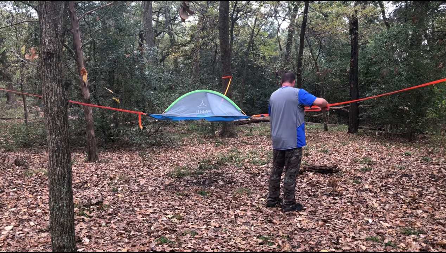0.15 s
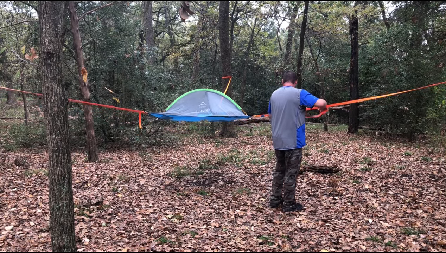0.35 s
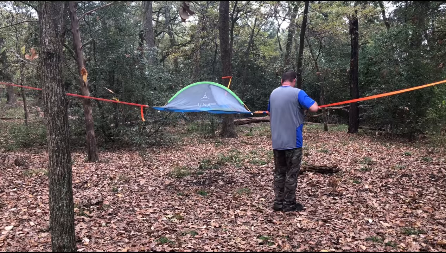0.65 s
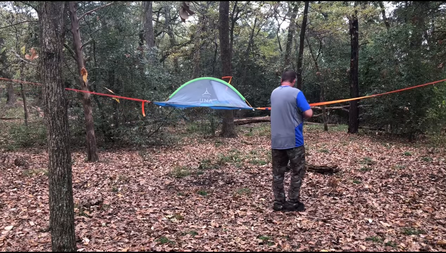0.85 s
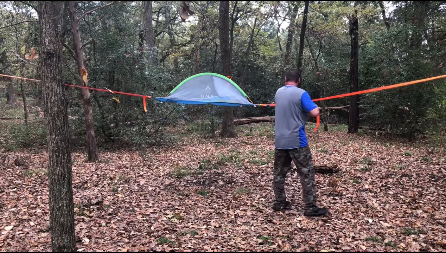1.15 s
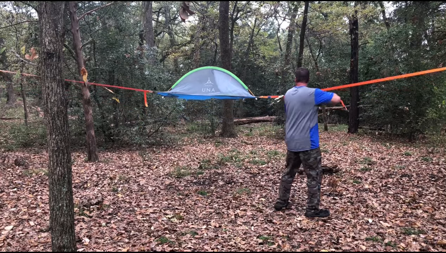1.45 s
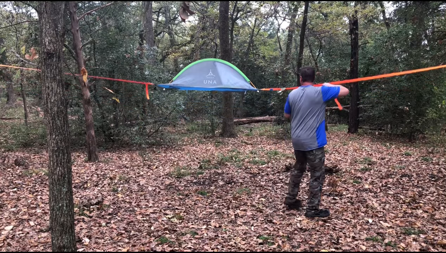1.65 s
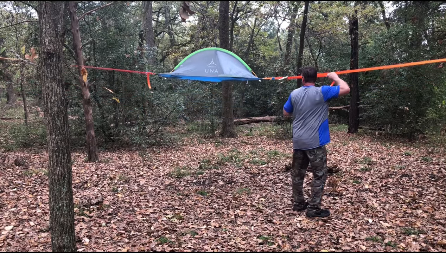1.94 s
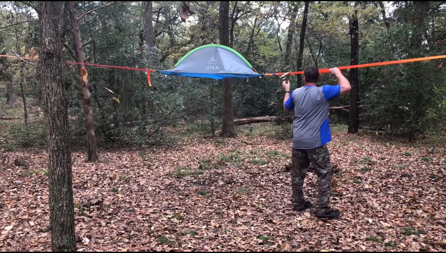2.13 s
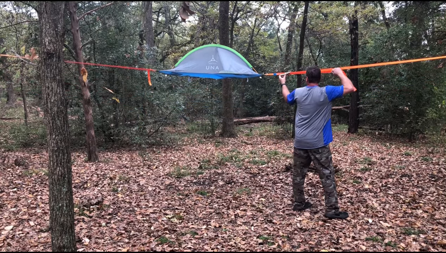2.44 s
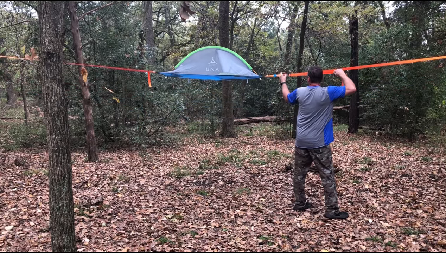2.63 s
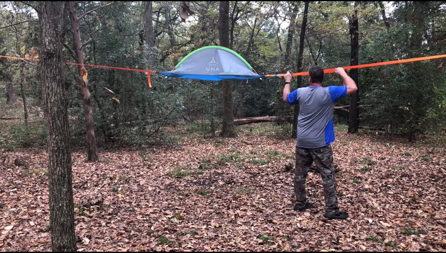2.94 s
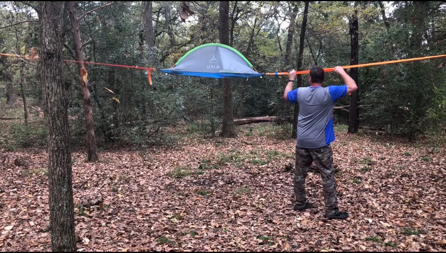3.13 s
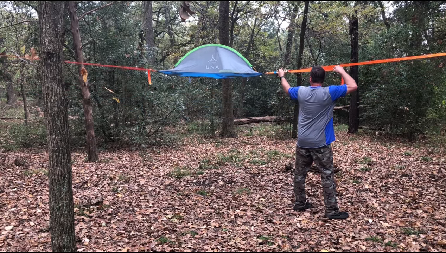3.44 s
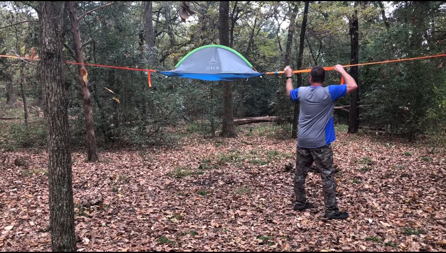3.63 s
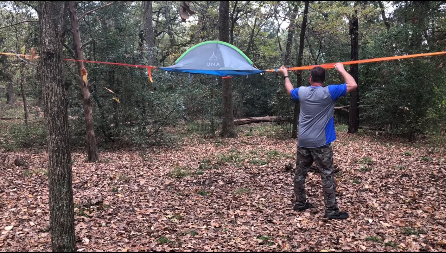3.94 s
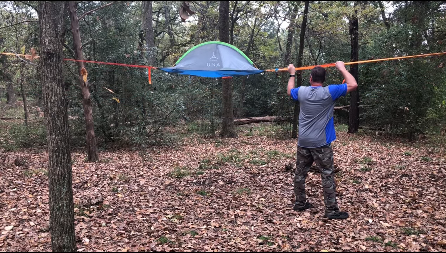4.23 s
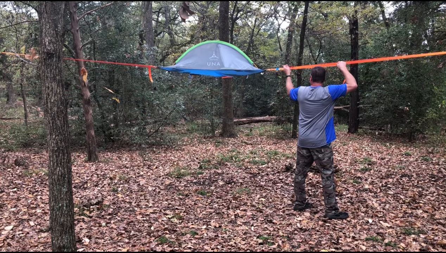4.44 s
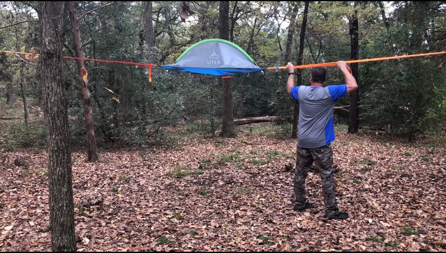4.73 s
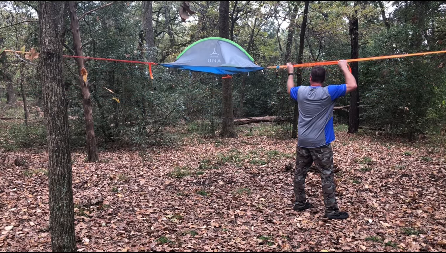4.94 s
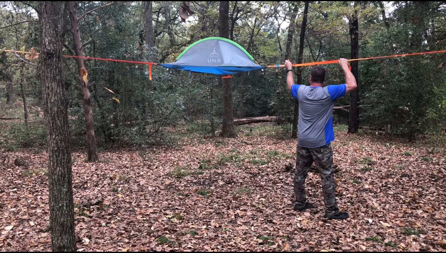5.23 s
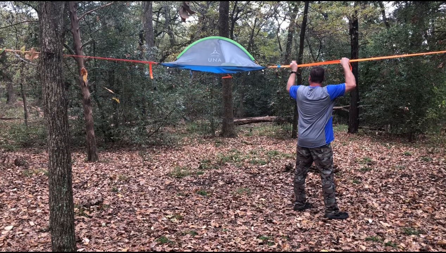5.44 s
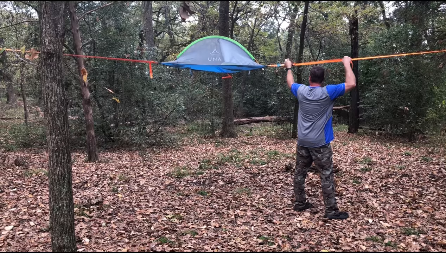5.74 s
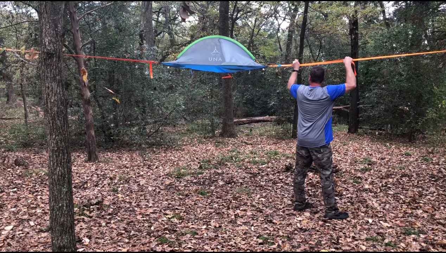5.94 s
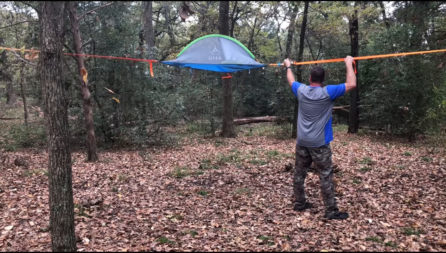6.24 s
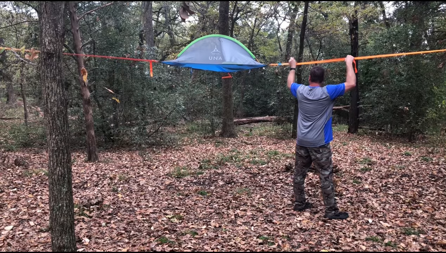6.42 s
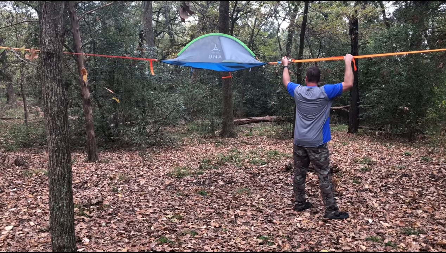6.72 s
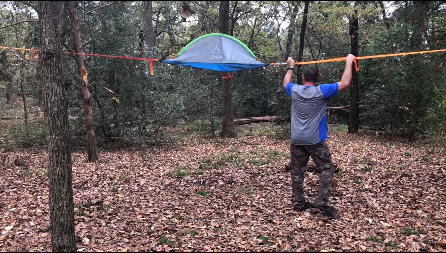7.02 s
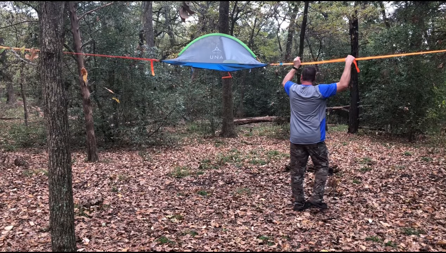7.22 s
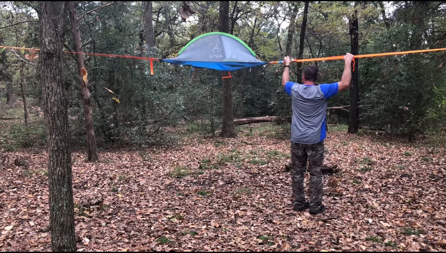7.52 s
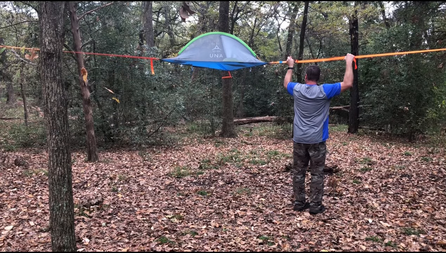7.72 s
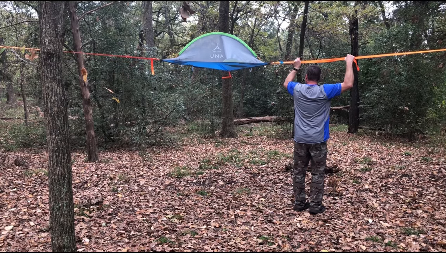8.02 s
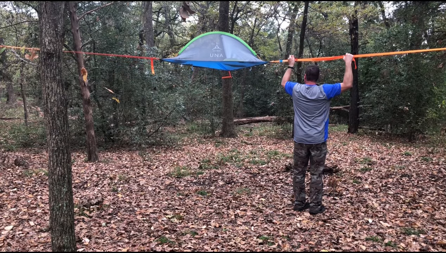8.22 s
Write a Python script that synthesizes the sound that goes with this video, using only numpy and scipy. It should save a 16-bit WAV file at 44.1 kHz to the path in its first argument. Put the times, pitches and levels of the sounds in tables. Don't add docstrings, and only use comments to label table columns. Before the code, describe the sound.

In a hushed wood, after a few leafy footsteps, a hand ratchet clacks steadily back and forth, sharp metallic clicks in pairs with light handle rattle.

```python
import sys
import numpy as np
from scipy import signal
from scipy.fft import rfft, irfft, next_fast_len
from scipy.io import wavfile
from scipy.ndimage import uniform_filter1d

SR = 44100
rng = np.random.default_rng(int(sys.argv[2]) if len(sys.argv) > 2 else 0)


def int16_out(signal):
    q = np.round(np.clip(np.atleast_2d(signal).T, -1, 1) * 32767)
    wavfile.write(sys.argv[1], SR, q.astype(np.int16))


def volts(x):
    e = np.asarray(x, float) / 20
    return 10 ** e


N = 369116

# f/Hz, density/dB per Hz
AIR_SPECTRUM = [(184, -14), (212, -20), (440, -22), (2310, -31.5), (2810, -35.5), (3520, -33.5),
                (10800, -45.5), (16500, -57)]
# f/Hz, density/dB per Hz
TRAFFIC_SPECTRUM = [(12, -44.5), (27, -12.5), (79, 4.5), (117, 0.5), (135, -3.5), (184, -28)]
# t/s, level/dB
HIGH_HISS_LEVEL = [(0.0, -95), (1.7, -80.5), (8.37, -73)]
# t/s, hold/s, crackle level/dB, release/s
FOOTSTEPS = [(0.397, 0.19, -54, 0.12), (0.946, .006, -59.5, 0.041), (0.987, 0.1, -57.5, .06),
             (1.12, 0.14, -52.5, 0.2), (1.472, 0.089, -70, .1), (1.6, .04, -62, .1),
             (1.712, .012, -57.5, 0.088), (1.803, 0.062, -50.5, 0.055), (1.998, .05, -62, .1),
             (2.097, 0.075, -60, 0.45), (2.295, 0.18, -57.5, .08), (2.387, 0.01, -55, .04),
             (2.52, .03, -69, .15), (6.99, .17, -61.5, 0.11)]
# f/Hz, density/dB per Hz
LEAF_SPECTRUM = [(880, -9), (1500, -22), (2270, 2.5), (3410, 2.5), (9470, -7), (13700, -6), (16000, -5.5)]
# t/s, peak level/dB, loudest f/Hz
HANDLE_RATTLES = [(2.637, -34, 9000), (2.6851, -54, 4100), (2.7443, -47, 5700), (2.797, -46.5, 7800),
                  (3.3148, -40.5, 8300), (3.3617, -40.5, 8550), (3.6404, -34, 8600), (3.6602, -34.5, 10100),
                  (3.9735, -39.5, 6200), (3.9953, -33, 8200), (4.246, -45, 8100), (4.515, -39.5, 8200),
                  (4.7345, -36, 6000), (4.7522, -33.5, 7860), (5.0224, -38.5, 7500), (5.0636, -37.5, 9000),
                  (5.273, -33, 9600), (5.295, -37, 7800), (5.5556, -38.5, 8800), (5.6075, -42, 7500),
                  (5.8163, -33.5, 7950), (6.1193, -35, 8750), (6.366, -30, 11400), (6.3874, -33.5, 8600),
                  (6.6826, -41.5, 4730), (6.7092, -34, 6250), (6.9653, -34, 9200), (7.3972, -38, 6650),
                  (7.664, -36.5, 8300), (8.2857, -37.5, 9000)]
# t/s, peak level/dB, rebound delay/ms, rebound level/dB, dullness/dB
SLACK_DROPS = [(3.0183, -19.5, 2, 3, -26), (3.1773, -14, 5.3, -20, -15), (3.7478, -17.5, 2.7, 6, -8),
               (3.8035, -12, 3.2, -16, -10), (4.3143, -12, 3.7, -9, -17), (4.3698, -15.5, 5.7, -24, -26),
               (4.8357, -16, 2.2, 1, -19), (4.8894, -20.5, 1.7, 1.5, -5), (5.397, -17, 3, -3.5, -8.5),
               (5.4531, -16, 4.1, -4.5, -9), (5.948, -14.5, 3.2, -5, -5.5), (6.0047, -18, 3.5, 2, -14.5),
               (6.513, -19, 2.9, 3, -12.5), (6.581, -19.5, 2.4, 4, -5), (7.2073, -15, 3.5, -2.5, -14),
               (7.2725, -22, 4.3, 3.3, 8), (7.9786, -19, 4.5, 1.5, -16), (8.1066, -16.5, 4.1, -0.5, -5)]
# slip lead/ms, slip level/dB, graze lead/ms, graze level/dB
SLACK_TICKS = [(20.3, -34.5, 2.1, -19.5), (6.45, -27, 2.5, -20), (14.1, -42, 4.9, -31),
               (8.3, -27, 3.6, -38.5), (11, -31.5, 1.2, -30), (8.85, -34, 1.9, -19), (12.7, -31, 2.9, -26),
               (5.6, -27, 1.6, -18), (12.5, -35, 4.5, -22.5), (10.3, -28, 6, -25), (13.9, -30, 3.7, -45),
               (12, -31, 6.1, -33), (12.7, -31, 3.7, -28.5), (13.8, -35, 12, -28), (15, -32, 3, -27),
               (19.6, -40, 7.1, -28), (25.2, -25, 3.9, -25), (25.7, -31, 4.5, -35)]
# f/Hz, level/dB, t60/s
SLACK_MODES = [(4000, -27, 0.0034), (5210, 5, 0.0022), (6000, 0.5, 0.0068), (8300, -5, 0.0087),
               (10030, -2, 0.0081), (10950, -1, 0.0048), (13500, -12.5, 0.0089), (14700, -4.5, 0.0052),
               (15100, -13.5, 0.006)]
# f/Hz, level/dB, t60/s
SLACK_FRAME_MODES = [(3550, -40.5, .05), (5000, -52.5, 0.027), (5390, -44, 0.026), (9600, -40.5, 0.035),
                     (13900, -40.5, .05)]
# t/s, peak level/dB, rebound level/dB, dullness/dB, frame ring level/dB
LOADED_DROPS = [(3.438, -16, -3, -6, 8), (3.5095, -16.5, -4.5, -6.5, 9.5), (4.0547, -15.5, 3, -10, -1),
                (4.139, -14.5, 0.5, -5.5, -11), (4.577, -16.5, 9, -19, -17), (4.6378, -16.5, 4.2, -15, -1),
                (5.1121, -11.5, -14, -13, 6.5), (5.1794, -16, -2.5, -11, -2), (5.656, -14.5, 0.6, -13, -6),
                (5.7092, -15, -4.5, 1, 0), (6.1813, -18, 2.5, -13, 0), (6.2269, -17, -2.7, -9, 6.5),
                (6.7735, -14.5, -3.5, -12, 6.5), (6.8402, -14, -12, -2.5, 2.5), (7.4872, -16, -1, 3, 7),
                (7.5572, -17.5, 3, 4, -6)]
# f/Hz, level/dB, t60/s
LOADED_MODES = [(1730, -19.5, 0.028), (2410, -33, 0.0081), (4020, -16.5, 0.09), (6000, -34, 0.041),
                (7333, 4, 0.02), (8940, 1.5, 0.0058), (10100, 4, 0.014), (10720, 2, 0.017),
                (11400, 0.5, 0.015), (11970, 9.5, 0.0082), (13540, -0.5, 0.021), (13900, -7, 0.015),
                (16000, 5, .012)]
# f/Hz, level/dB, t60/s
LOADED_FRAME_MODES = [(7420, -21, 0.043), (7420, -29.5, 0.049), (10100, -41.5, .04), (10690, -31, .05),
                      (11850, -16.5, .035), (12080, -20, 0.04), (13400, -34, .04)]
LEVER_FREEDOM = [1, -3, 0, 0, 3, 7, 5, 0.5]
# f/Hz, t60/s
TRUNK_DECAY = [(1500, 0.12), (4000, 0.62), (8000, 0.6), (12000, 0.42), (16000, 0.25)]


def in_time(rows):
    s, *columns = np.transpose(rows)
    return [np.interp(np.arange(N) / SR, s, column) for column in columns]


def at_hz(points, hz):
    table_hz, values = np.transpose(points)
    return np.interp(np.log(hz + 1), np.log(table_hz), values)


def rms_one(x):
    return x / np.sqrt(np.mean(x ** 2) + 1e-20)


def coloured(x, spectrum):
    size = next_fast_len(len(x))
    weight = volts(at_hz(spectrum, np.fft.rfftfreq(size, 1 / SR)))
    return irfft(rfft(x, size) * weight, size)[:len(x)]


def butter(x, hz, kind, order=2):
    return signal.sosfilt(signal.butter(order, hz, kind, fs=SR, output="sos"), x)


def add(track, s, sound):
    i = int(s * SR)
    track[i:i + len(sound)] += sound[:N - i]


def air():
    high_hiss_db, = in_time(HIGH_HISS_LEVEL)
    noise = rng.standard_normal(N)
    far_db = -60 + 0.1551 * np.arange(N) / SR
    far = volts(far_db) * rms_one(butter(coloured(noise, AIR_SPECTRUM), 155, "high", order=4))
    rumble = volts(-59) * rms_one(butter(coloured(noise, TRAFFIC_SPECTRUM), 134, "low", order=4))
    high_hiss = volts(high_hiss_db) * rms_one(butter(rng.standard_normal(N), 11000, "high"))
    return far + rumble + high_hiss


def tread():
    attack_s, arch_db = 0.14, 2
    t = np.arange(N) / SR
    start, hold, db, release = np.transpose(FOOTSTEPS)[:, :, None]
    along = np.clip((t - start) / hold, 0, 1)
    before = np.maximum(start - t, 0) / attack_s
    after = np.maximum(t - start - hold, 0) / release
    level_db = db - arch_db * (2 * along - 1) ** 2 - 30 * (before + after)
    return np.sqrt(np.sum(volts(level_db) ** 2, axis=0))


def leaves():
    snaps_per_s, crush_db = 6000, -5.5
    sizes = volts(2.8 * np.minimum(rng.exponential(1, N), 5)) * rng.choice([-1, 1], N)
    clumps = volts(2.2 * rms_one(butter(rng.standard_normal(N), 60, "low")))
    snaps = sizes * (rng.random(N) < snaps_per_s / SR) * clumps
    crackle = rms_one(butter(coloured(snaps, LEAF_SPECTRUM), 1200, "high"))
    crush = rms_one(butter(snaps, [600, 2200], "band"))
    return tread() * (crackle + volts(crush_db) * crush)


def chatter(rise_ms, fall_ms):
    ms = np.arange(600) / SR * 1000
    contacts = rng.standard_normal(600) * volts(3 * rng.standard_normal(600))
    return contacts * (1 - np.exp(-ms / rise_ms)) * np.exp(-ms / fall_ms)


def modes(table, spread_db, size):
    t = np.arange(size) / SR
    hz, level_db, t60 = np.transpose(table)[:, :, None]
    strength = volts(level_db + spread_db * rng.standard_normal(hz.shape))
    decay = np.exp(-np.log(1000) * t / t60)
    return np.sum(strength * decay * np.sin(2 * np.pi * hz * t), axis=0)


def steel_body(steel, spread_db, modes_db):
    body = volts(modes_db) * modes(steel, spread_db, size=1000)
    body[:2] += [1, -.9]
    return body


def click(force, body, dull_db):
    shelf_hz = 6000
    sound = signal.fftconvolve(force, body)
    r = np.exp(-2 * np.pi * shelf_hz / SR)
    low = signal.lfilter([1 - r], [1, -r], sound)
    sound = sound + (volts(np.clip(dull_db, -22, 8) - 1.5) - 1) * low
    peak = np.sqrt(uniform_filter1d(2 * sound[:400] ** 2, size=44).max() + 1e-20)
    return sound / peak


def all_round(hit, body, dull_db):
    smooth = click(np.ones(1), body, dull_db)
    return smooth * np.sqrt(np.sum(hit ** 2) / np.sum(smooth ** 2))


def ticks():
    rattle_dull_db, bounce_ms, bounce_db = 5, 7.3, -7.5
    slip_hz, slip_dull_db, graze_hz, graze_dull_db = 9000, -11, 11860, 9
    spread_octaves = 0.26
    touches = []
    lead_luck = rng.standard_normal((len(SLACK_TICKS), 2))
    for (s, *_), (slip_ms, slip_db, graze_ms, graze_db), luck in zip(SLACK_DROPS, SLACK_TICKS, lead_luck):
        slip, graze = 2 ** (spread_octaves * np.clip(luck, -2, 2))
        touches.append((s - slip_ms / 1000, slip_db, slip_dull_db, slip_hz * slip))
        touches.append((s - graze_ms / 1000, graze_db, graze_dull_db, graze_hz * graze))
    bounce_luck = rng.uniform(0.23, 1.5, (len(HANDLE_RATTLES), 2))
    for (s, db, hz), (delay, pitch) in zip(HANDLE_RATTLES, bounce_luck):
        touches.append((s, db, rattle_dull_db, hz))
        touches.append((s + bounce_ms * delay / 1000, db + bounce_db, rattle_dull_db, hz * pitch))
    out = np.zeros((2, N))
    for s, db, dull_db, hz in touches:
        body = steel_body([(min(hz, 15000), 0, .004)], 0, -9)
        hit = volts(db) * click(chatter(0.25, 1.0), body, dull_db)
        add(out[0], s, hit)
        add(out[1], s, all_round(hit, body, dull_db))
    return out


def wood(x, near_db, near_t60, far_db):
    near_start_s = 0.012
    t = np.arange(SR // 2 + SR // 4) / SR
    near = rng.standard_normal(len(t)) * volts(3.5 * rng.standard_normal(len(t)) - 60 * t / near_t60)
    near_onset = np.clip((t - near_start_s) / 0.00197, .3, 1) * (t > .003)
    response = volts(near_db) * near * near_onset
    edges = 1000 * 2 ** np.arange(0, 4.3, .5)
    for low, high in zip(edges, edges[1:]):
        band = butter(rng.standard_normal(len(t)), [low, high], "band")
        t60 = at_hz(TRUNK_DECAY, np.sqrt(low * high))
        response += volts(far_db - 60 * t / t60) * band * np.clip(t / 0.0027, 0, 1)
    return signal.fftconvolve(x, response)[:N]


def seated(sound):
    seat_ms, edge_ms, seated_db = 6.3, 0.71, -8.5
    ms = np.arange(len(sound)) / SR * 1000
    return sound * volts(seated_db / (1 + np.exp(np.clip((seat_ms - ms) / edge_ms, -30, 30))))


def pawl(drops, steel, frame, rebound_fall_ms, modes_db, round_db):
    frame_direct_db = 8.5
    lever_hz = 9000
    out = np.zeros((2, N))
    mean_body = steel_body(steel, 0, round_db)
    for s, db, lag_ms, rebound_db, dull_db, ring_db, lever_db in drops:
        body = steel_body(steel, 2.5, modes_db)
        landing = click(chatter(0.31, 1.6), body, dull_db)
        rebound = click(chatter(0.1, rebound_fall_ms), body, dull_db)
        rebound = volts(min(rebound_db, 3)) * np.roll(rebound, int(lag_ms * SR / 1000))
        hit = seated(volts(db) * (landing + rebound))
        held_frame = [(hz, level + lever_db * (hz > lever_hz), t60) for hz, level, t60 in frame]
        song = volts(db + ring_db) * modes(held_frame, 2.8, size=8000)
        fade_in = np.minimum(np.arange(8000) / 60.0, 1)
        add(out[0], s, hit)
        add(out[0], s, volts(frame_direct_db) * seated(seated(song)) * fade_in)
        add(out[1], s, song)
        add(out[1], s, all_round(hit, mean_body, dull_db))
    return out


def slack_returns():
    ring_db, lever_db = 10.5, 0
    drops = [(*drop, ring_db, lever_db) for drop in SLACK_DROPS]
    direct, spread = pawl(drops, SLACK_MODES, SLACK_FRAME_MODES, 1.5, -20, -24)
    direct = butter(direct, 3200, "high", order=1)
    spread = butter(spread, 2570, "high", order=7)
    return np.stack([direct, spread])


def loaded_pulls():
    rebound_ms = 3.2
    drops = []
    for (s, db, *rest), lever_db in zip(LOADED_DROPS, np.repeat(LEVER_FREEDOM, 2)):
        drops.append((s, db, rebound_ms, *rest, lever_db))
    return pawl(drops, LOADED_MODES, LOADED_FRAME_MODES, 3.1, -18, -51)


def scene():
    ratchet = ticks() + slack_returns() + loaded_pulls() + 1e-12 * rng.standard_normal(N)
    direct, spread = butter(ratchet, 1304, "high", order=3)
    swing = 2 * np.pi * 1.37 * np.arange(N) / SR
    echo = np.zeros(N)
    for share in (np.cos(swing), np.sin(swing)):
        echo += wood(spread * share, near_db=-22.5, near_t60=0.053, far_db=-40.5)
    return (air() + leaves() + direct + echo)[None]


def band_limit(x):
    return signal.sosfilt(signal.butter(12, 17130, fs=SR, output="sos"), x)


def record(dry):
    top = signal.cheby2(16, 33, 16000, fs=SR, output="sos")
    mix = signal.sosfilt(top, butter(dry, 36, "high", order=3))
    return band_limit(mix)


dry = scene()
out = record(dry)
int16_out(out)
```